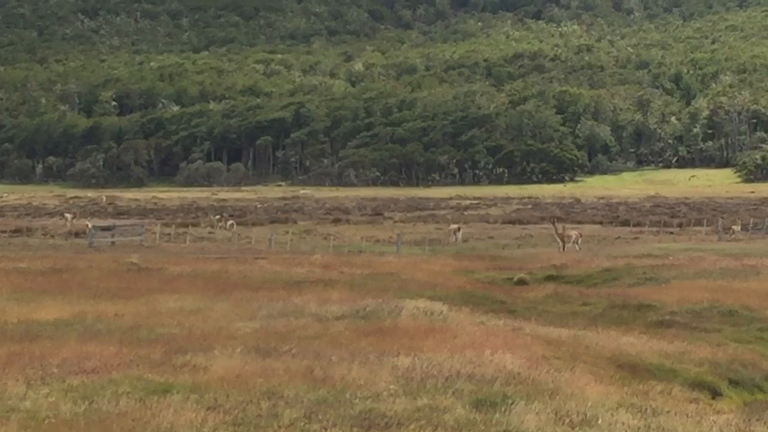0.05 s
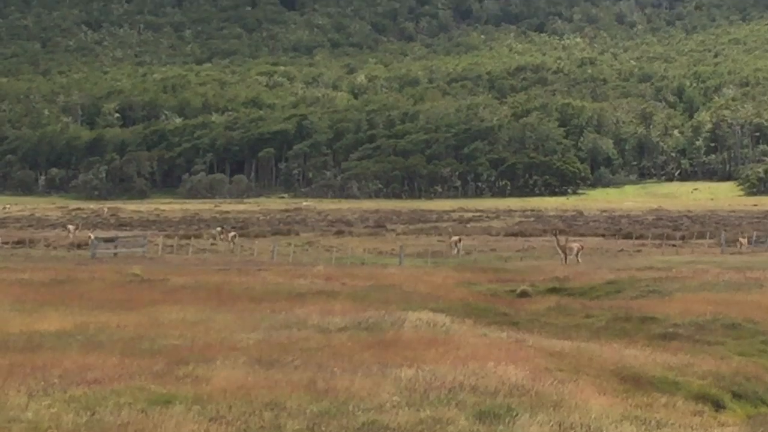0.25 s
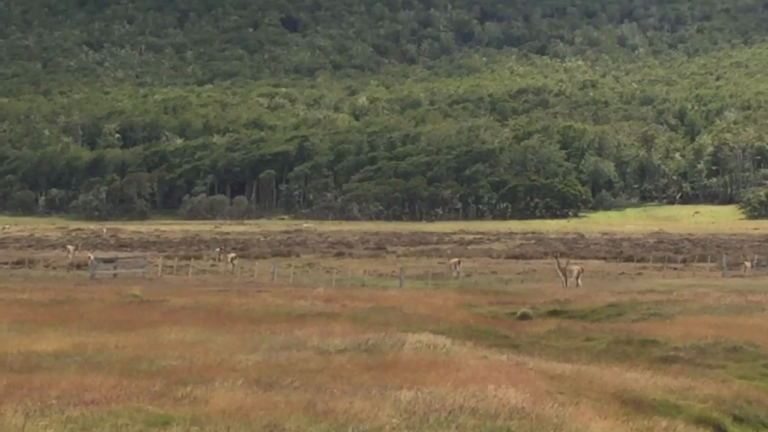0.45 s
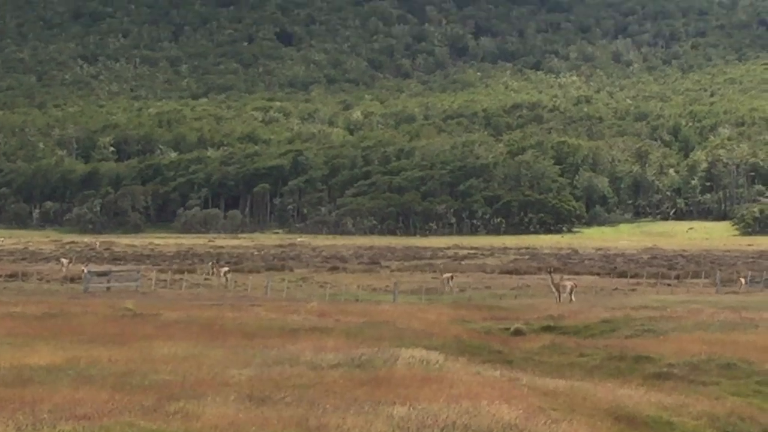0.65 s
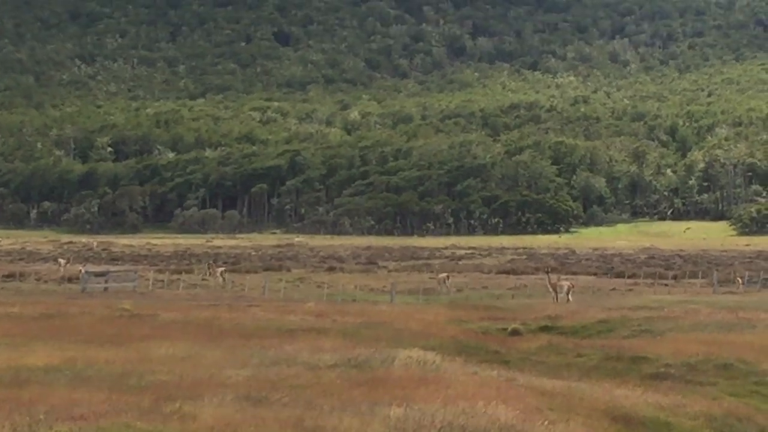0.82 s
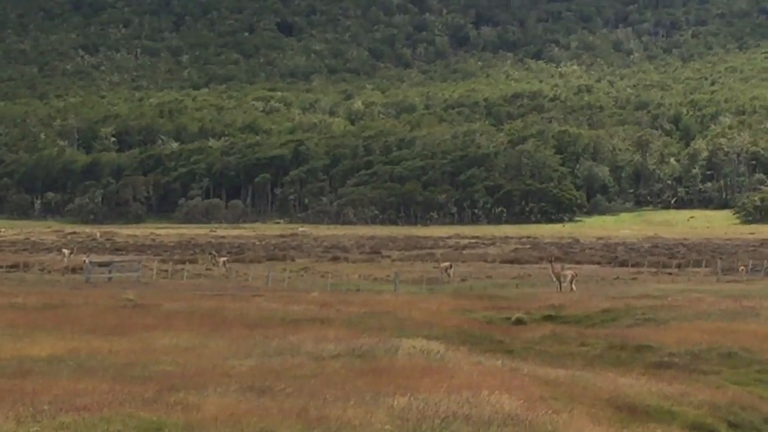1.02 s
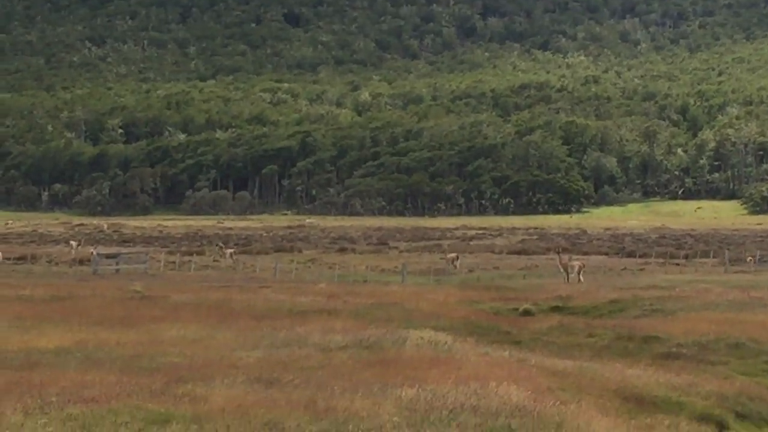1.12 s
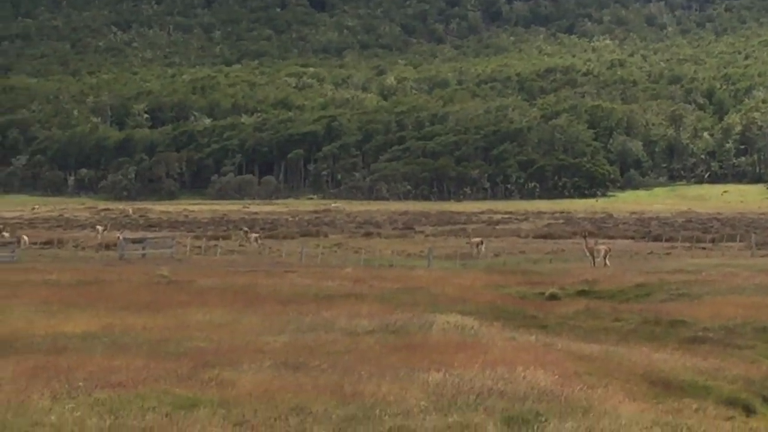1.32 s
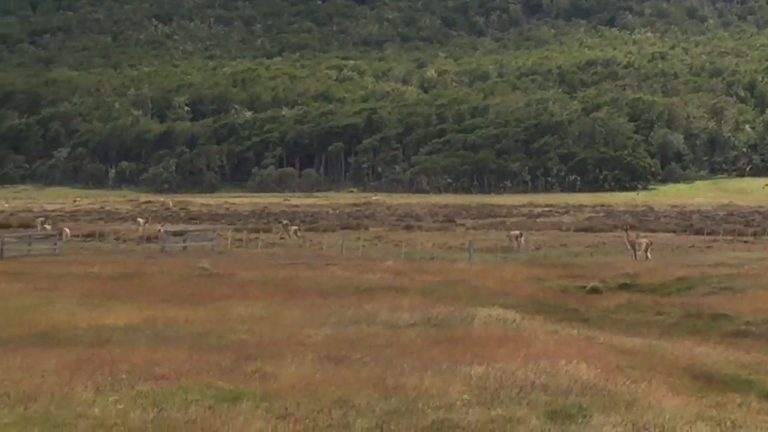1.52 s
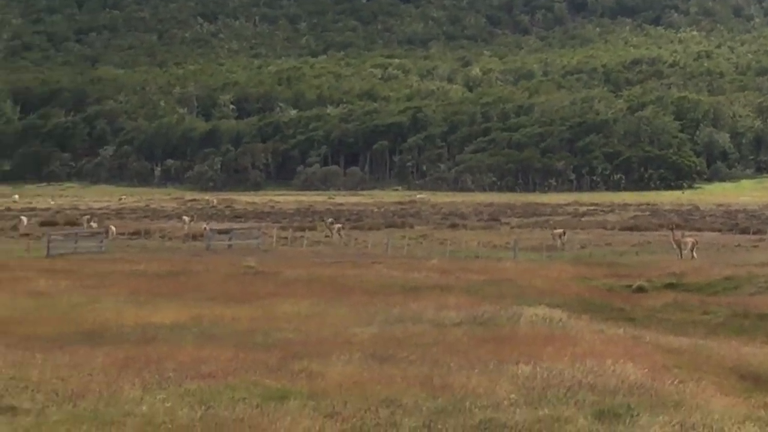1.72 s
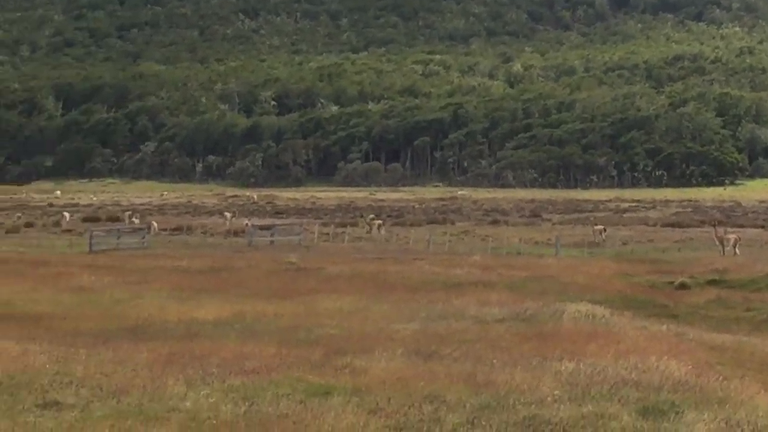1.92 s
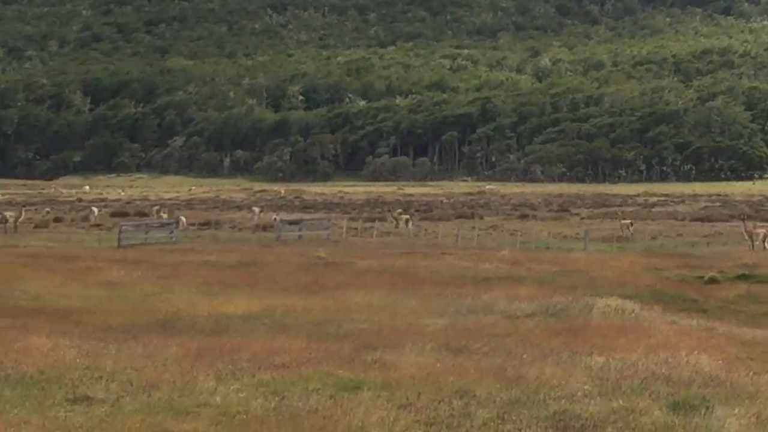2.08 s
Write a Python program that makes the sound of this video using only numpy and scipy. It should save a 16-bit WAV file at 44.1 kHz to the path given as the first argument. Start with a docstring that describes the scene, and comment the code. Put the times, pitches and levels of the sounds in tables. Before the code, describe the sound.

Rapid whistling bleats from a faraway guanaco in open grassland, over low gusting wind.

```python
"""Open grassland: a distant guanaco gives eight short bleats, about five a second.
Each bleat is a high arched whistle; a second, lower vibration in the throat adds side tones
and breaks into a rasp mid-call. The land scatters back a faint tail.
Wind rumbles on the microphone and buffets it in short gusts, over soft hiss and rustling grass."""
import sys
import numpy as np
from scipy import signal
from scipy.fft import rfft, irfft
from scipy.io import wavfile
from scipy.ndimage import uniform_filter1d, map_coordinates

SR = 44100
rng = np.random.default_rng(int(sys.argv[2]) if len(sys.argv) > 2 else 0)


def persist_wave(psi):
    """Save psi, clipped to +-1, as 16-bit WAV."""
    counts = np.round(np.clip(psi, -1, 1) * 32767).astype(np.int16)
    wavfile.write(sys.argv[1], SR, np.atleast_2d(counts).T)


N = 94815


def amp(db):
    return 10 ** (np.asarray(db) / 20)


def unit(x):
    return x / np.sqrt(np.mean(x ** 2) + 1e-20)


def coloured_noise(n, points):
    """White noise through an EQ curve of (f/Hz, gain/dB) points."""
    hz, db = np.transpose(points)
    f = np.fft.rfftfreq(n, 1 / SR)
    curve = amp(np.interp(np.log(f + 1), np.log(hz), db))
    return irfft(rfft(rng.standard_normal(n)) * curve, n)


def wander(n, rate_hz):
    """A smooth random modulator of about unit size, two new values a cycle."""
    position = np.arange(n) * 2 * rate_hz / SR
    return map_coordinates(rng.standard_normal(1024), [position], order=3, mode="mirror")


def bleat(length, top_hz, low_hz, whistle_db, octave_db, third_db, lower_db, upper_db, fall_db, rasp_db):
    """Two coupled throat vibrations: a whistle, side tones from the slower one, a rasp at full effort."""
    # pitch bend: share of the length, share of the top pitch
    arch = [(0, 1.0), (.06, .98), (.14, .971), (.33, .992), (.5, 1.0), (.62, .997), (.8, .971), (1, .935)]
    # side tones around the fundamental: offset/multiples of the low vibration, relative level/dB
    lower_tones = [(-1, -33), (1, 3.5), (2, -23)]
    # mid-call the low vibration halves its rate unsteadily:
    # whistle harmonic, offset/multiples of the low vibration, level against the rasp noise/dB
    split_tones = [(1, .5, 3), (1, 1.5, -7), (1, 2, -7), (2, -1, -5), (2, .5, -9), (2, 1.5, -15)]
    # rasp colour: f/Hz, gain/dB
    rasp_eq = [(700, -57.5), (1100, -5.5), (1350, -39.5), (1600, -20), (1850, 5.5), (2120, -9.5),
               (2400, -12), (2700, -5), (2900, -9), (3300, -13), (3950, -9.5), (4500, -34), (6500, -45)]
    attack_s, release_s = .0032, .013
    low_delay_s, low_fade_s, low_early_stop_s = .007, .008, .012
    whistle_swell_db, harmonic_swell_db, side_swell_db, rasp_swell_db = 12.5, 5, 20, 36.5
    jitter, low_jitter, shimmer, flicker_db = .0044, .035, .19, 2.2

    t = np.arange(0, length, 1 / SR)
    n = len(t)
    slack = 1 - np.sin(np.pi * t / length)  # 1 at the ends, 0 at full effort
    bend = uniform_filter1d(np.interp(t / length, *np.transpose(arch)), size=400, mode="nearest")
    high_pitch = top_hz * bend * (1 + jitter * wander(n, 150))
    low_pitch = low_hz / bend ** 1.22 * (1 + low_jitter * (1 - slack) * wander(n, 140))
    high_phase = 2 * np.pi * np.cumsum(high_pitch) / SR
    low_phase = 2 * np.pi * np.cumsum(low_pitch) / SR

    def side_tone(harmonic, offset, db, wobble_rad=.4):
        """A wavering tone, offset from a whistle harmonic by a multiple of the low vibration."""
        level = amp(db + flicker_db * wander(n, 72))
        return level * np.sin(harmonic * high_phase + offset * low_phase + wobble_rad * wander(n, 63.3))

    whistle = amp(whistle_db - whistle_swell_db * slack) * np.sin(high_phase)
    harmonics = amp(octave_db) * np.sin(2 * high_phase) + amp(third_db) * np.sin(3 * high_phase)
    whistle += amp(-harmonic_swell_db * slack) * harmonics

    sides = sum(side_tone(1, offset, lower_db + db) for offset, db in lower_tones)
    sides += side_tone(2, 1, upper_db) + side_tone(2, 1.86, upper_db - fall_db)
    sides += side_tone(2, -1, lower_db - 18.5 - 20 * slack)  # faint, just under the octave
    coupling = np.clip(np.minimum(t - low_delay_s, length - low_early_stop_s - t) / low_fade_s, 0, 1)
    sides *= coupling * amp(-side_swell_db * slack ** 2.25)

    split = sum(side_tone(*row, wobble_rad=1) for row in split_tones)
    rasp_noise = unit(coloured_noise(SR, rasp_eq))[:n]
    rasp = amp(rasp_db - rasp_swell_db * slack) * (rasp_noise + split)
    gate = np.minimum(t / attack_s, 1) * np.minimum((length - t) / release_s, 1)
    return gate * (whistle * (1 + shimmer * wander(n, 59)) + sides + rasp)


def guanaco():
    """A quick run of eight bleats, each pitched a little below the last."""
    # t/s, length/s, top pitch/Hz, low vibration/Hz, then mid-call level/dB of: fundamental, octave,
    # third harmonic, lower side tones, upper side tone; drop to the next side tone/dB, rasp level/dB
    bleats = [(0.647, .108, 1581, 479.5, -56, -63.5, -78.5, -69.5, -64, 13.5, -70),
              (.822, 0.11, 1569, 451.7, -50.5, -62, -85, -67, -69.5, 2, -64),
              (1.012, 0.1, 1559, 466, -48, -58.5, -81.5, -70, -61, 13, -63.5),
              (1.206, 0.1, 1556, 462, -48, -57.5, -90, -61.5, -66.5, 28.5, -63.5),
              (1.405, 0.098, 1544, 459, -51, -60, -88, -59, -61.5, 15.5, -64.5),
              (1.602, 0.095, 1538, 447, -51.5, -53.5, -103, -58.5, -66.5, 1, -62.5),
              (1.804, 0.094, 1519, 455, -57, -55.5, -77, -61, -58.5, 6.5, -66.5),
              (2.009, 0.092, 1512, 454, -58, -58, -91, -63, -64, 6, -70.5)]
    calls = np.zeros(N)
    for start, *voice in bleats:
        call = bleat(*voice)
        onset = round(start * SR)
        calls[onset:onset + len(call)] += call
    return calls


def land_scatter(calls):
    """A faint diffuse tail thrown back by the ground and the forest edge."""
    # tail colour: f/Hz, gain/dB
    tail_eq = [(800, 5.5), (1550, -7), (2000, -4.5), (2950, -11.5), (3500, -5), (5000, -14.5)]
    send_db, t60_s, predelay_s = -19, .5, .0097
    t = np.arange(SR) / SR
    tail = coloured_noise(SR, tail_eq) * amp(-60 * t / t60_s) * np.clip(t / predelay_s - 1, 0, 1)
    tail /= np.sqrt(np.mean(abs(rfft(tail)[1400:1700]) ** 2))  # unity gain around the whistle's pitch
    return amp(send_db) * signal.fftconvolve(calls, tail)[:N]


def gusts():
    """Bursts of turbulence buffet the microphone; faster air makes smaller eddies and reaches higher."""
    # t/s, length/s, level/dB, low-pass corner/Hz
    buffets = [(.03, 0.029, -34.5, 116), (.109, 0.025, -34.5, 290), (0.21, .092, -20, 340),
               (0.2204, 0.0053, -29, 860), (0.238, 0.0087, -20, 678), (0.239, 0.016, -46.5, 1208),
               (0.241, 0.03, -27.5, 131.2), (0.267, .028, -25, 546), (0.354, 0.083, -44.5, 197),
               (0.45, .12, -41.5, 184.7), (.556, 0.088, -23.5, 250), (0.569, 0.026, -28, 370),
               (0.618, 0.0052, -22, 325), (0.634, 0.012, -16, 110), (0.726, 0.015, -38, 320),
               (0.747, .17, -46.5, 207), (0.864, 0.0096, -40, 323), (0.888, 0.019, -44, 320),
               (0.993, 0.056, -36, 217), (1.049, 0.0353, -24.5, 224), (1.138, 0.029, -28, 206),
               (1.154, 0.0074, -19.5, 259), (1.496, 0.033, -49.5, 248), (1.594, 0.029, -38, 308),
               (1.744, 0.0053, -41, 354), (1.829, 0.0083, -32.5, 227), (1.833, 0.02, -37, 177),
               (1.89, 0.015, -35.5, 132)]
    fade_s, order = .0069, 4.37
    top_ratio, top_order = 2.82, 2.4  # above this multiple of the corner the smallest eddies die out
    f = np.fft.rfftfreq(N, 1 / SR)
    wind = np.zeros(N)
    for start, length, db, corner_hz in buffets:
        t = np.arange(N) / SR - start
        ramp = np.clip(np.minimum(t, length - t) / min(fade_s, length / 2), 0, 1)
        burst = np.sin(np.pi / 2 * ramp) ** 2 * rng.standard_normal(N)
        lowpass = 1 / np.sqrt(1 + (f / corner_hz) ** (2 * order))
        lowpass /= np.sqrt(1 + (f / (top_ratio * corner_hz)) ** (2 * top_order))
        eddies = irfft(rfft(burst) * lowpass, N)
        wind += amp(db) * unit(eddies) * np.sqrt(length * SR / N)  # level over the gust's own length
    return wind


def wind_rumble():
    """Large slow eddies on the microphone, fluttering as they ride the wind's strength."""
    # wind strength: t/s, relative level/dB
    strength = [(0.0, -53.5), (0.04, -36), (0.19, -44), (0.21, -33.5), (0.26, -19), (0.35, -45.5),
                (0.41, -34.5), (0.44, -39.5), (0.65, -29), (0.69, -34.5), (1.17, -39.5), (1.21, -45.5),
                (1.32, -42), (1.37, -52), (1.6, -40), (1.92, -42.5), (2.03, -61.5), (2.15, -45.5)]
    # rumble colour: f/Hz, gain/dB
    rumble_eq = [(12, -59), (28, -36), (45, 1.5), (62, 5.5), (100, 0), (150, -8), (220, -25.5), (350, -37),
                 (600, -48), (1500, -88.5)]
    gain_db, flutter_db, flutter_hz = 1.5, 2.5, 22
    level_db = np.interp(np.arange(N) / SR, *np.transpose(strength)) + flutter_db * wander(N, flutter_hz)
    eddies = coloured_noise(N, rumble_eq)
    eddies /= np.sqrt(abs(uniform_filter1d(eddies ** 2, 1800)) + 1e-12)  # even out chance swells
    return amp(gain_db + level_db) * eddies


def grass():
    """A steady bed of faint hiss, with soft swells as wind passes through the grass."""
    # hiss colour: f/Hz, gain/dB
    hiss_eq = [(100, -1.5), (500, 6.5), (1000, 5.5), (2000, 1), (3500, 0.5), (5000, -3), (6500, -3),
               (7600, -6), (9500, -6), (10300, -10), (11200, -7), (15500, -14.5)]
    # rustle colour: f/Hz, gain/dB
    rustle_eq = [(150, 5), (700, 6), (1200, 2.5), (2100, 4), (3500, -11.5), (6500, -31), (10000, -20),
                 (15000, -18)]
    # swells of rustle: centre t/s, half width/s, level/dB
    rustles = [(.0, .05, -89), (.19, .07, -72.5), (0.359, .035, -69.5), (.53, .07, -72.5),
               (1.138, .04, -74), (1.379, .025, -73)]
    hiss_db = -75.5
    t = np.arange(N) / SR
    hiss = amp(hiss_db) * unit(coloured_noise(N, hiss_eq))
    swells = sum(amp(db) * np.exp(-((t - centre) / width) ** 2) for centre, width, db in rustles)
    return hiss + swells * unit(coloured_noise(N, rustle_eq))


def scene():
    """The far animal and its tail, mixed in mono with close wind and the grass."""
    air = wind_rumble() + grass()
    calls = guanaco()
    return (calls + land_scatter(calls) + air + gusts())[None]


def record(dry):
    """The microphone's bass roll-off and a steep cut of the highest treble."""
    low_cut_hz, high_cut_hz = 36, 15700
    low_cut = signal.butter(4, low_cut_hz, "highpass", fs=SR, output="sos")
    high_cut = signal.firwin(511, high_cut_hz, window=("kaiser", 9), fs=SR)
    return signal.oaconvolve(signal.sosfilt(low_cut, dry), high_cut[None], "same")


dry = scene()
out = record(dry)
persist_wave(out)
```